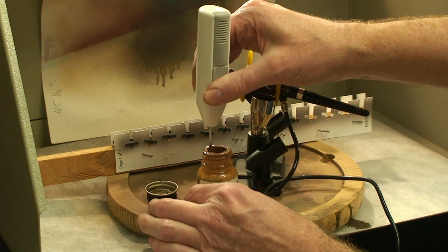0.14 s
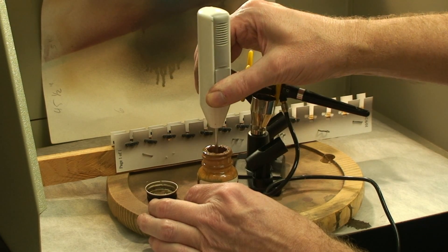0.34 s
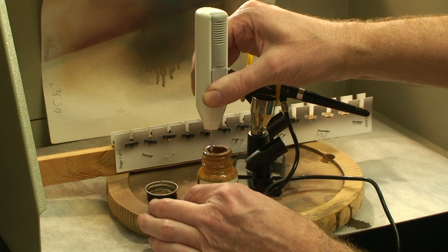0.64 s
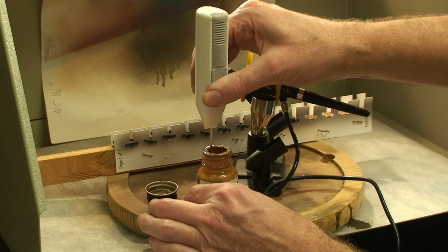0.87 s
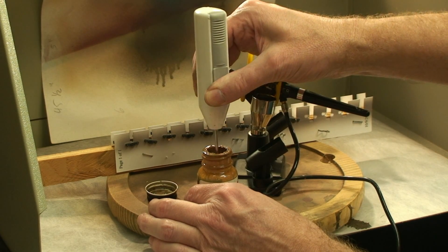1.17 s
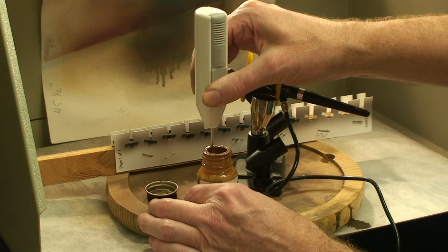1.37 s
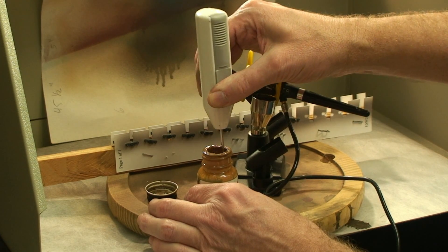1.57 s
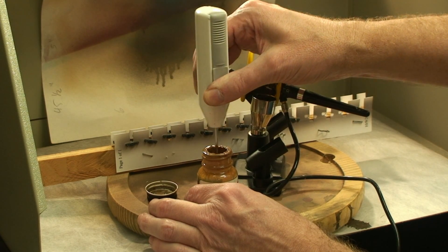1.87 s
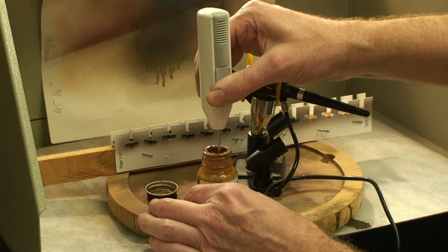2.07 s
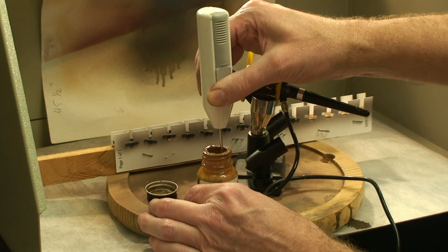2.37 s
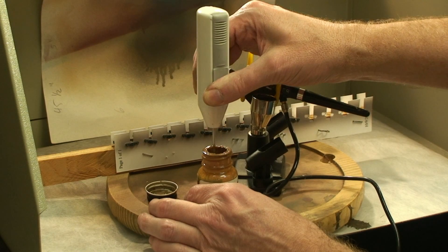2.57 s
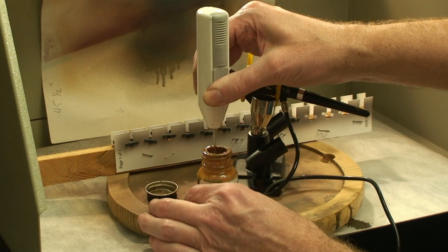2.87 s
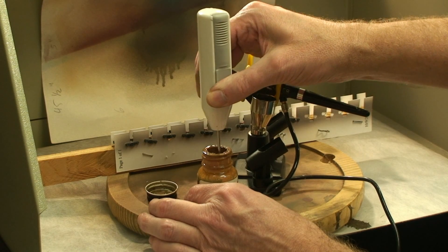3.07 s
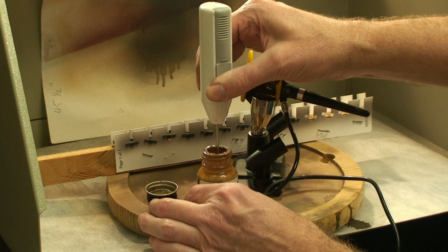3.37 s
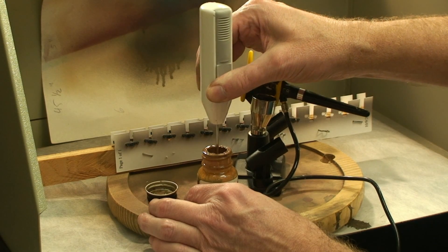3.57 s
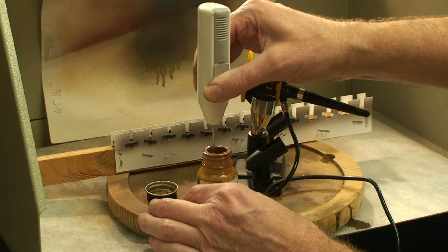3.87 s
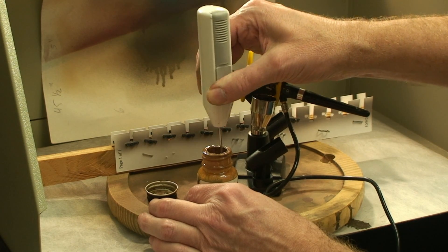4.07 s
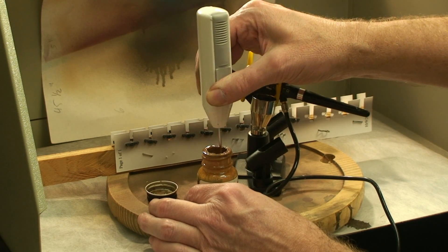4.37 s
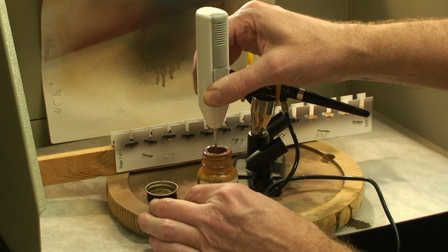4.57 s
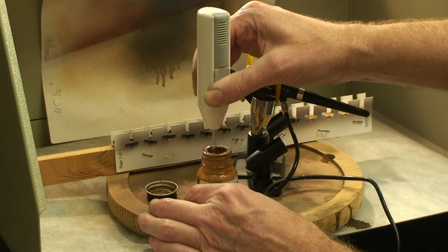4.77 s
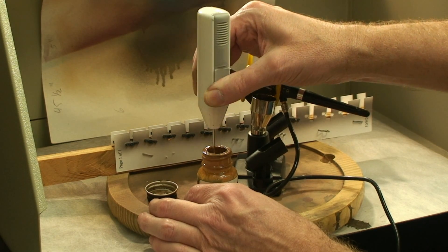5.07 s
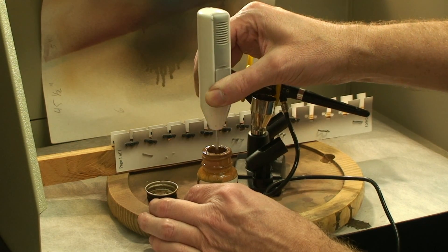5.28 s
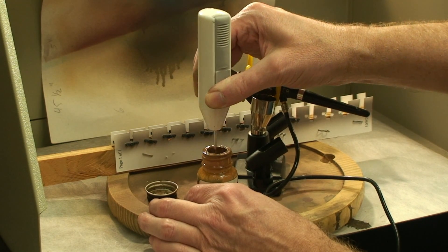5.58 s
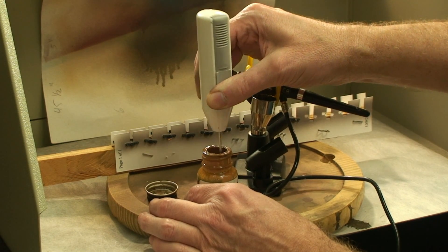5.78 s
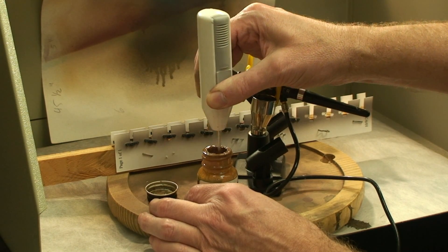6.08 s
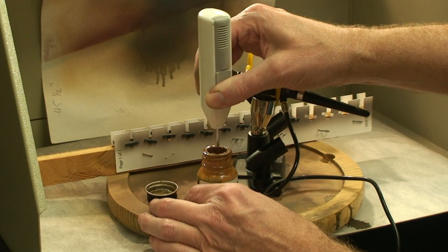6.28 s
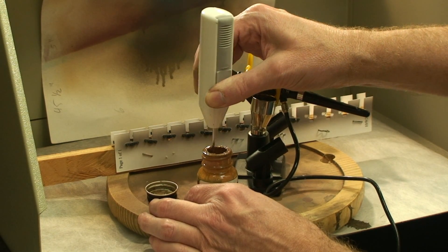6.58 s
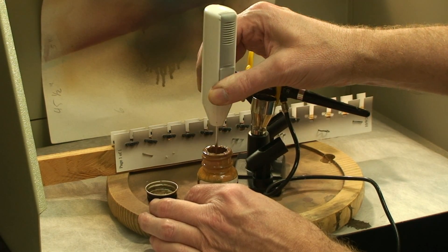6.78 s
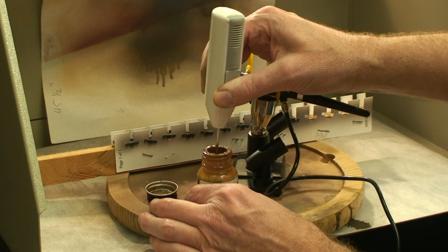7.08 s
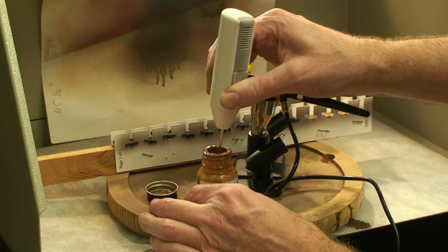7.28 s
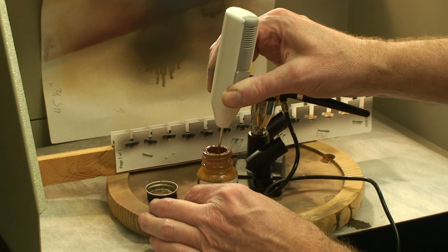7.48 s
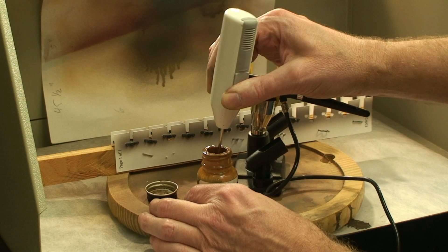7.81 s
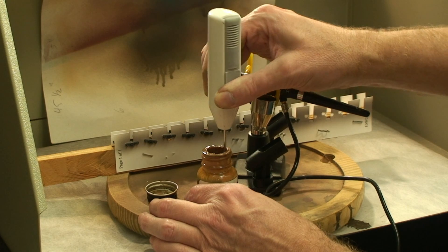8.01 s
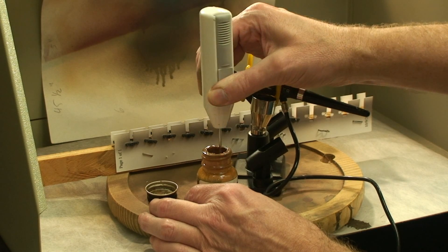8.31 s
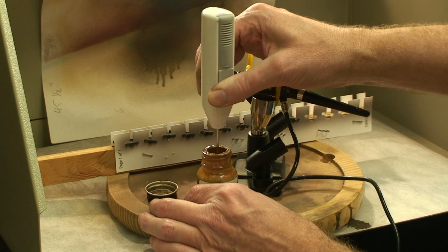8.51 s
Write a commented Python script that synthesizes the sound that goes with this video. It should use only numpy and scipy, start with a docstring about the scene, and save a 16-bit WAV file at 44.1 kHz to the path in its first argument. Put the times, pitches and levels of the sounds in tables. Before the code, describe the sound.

A small battery stirrer whines thinly in a little glass jar, its metal shaft rattling in irregular bursts of dull knocks and bright clinks.

```python
"""A battery stirrer's paddle knocks the floor of a small glass jar on a wooden board, or grazes its wall.
Floor knocks are dull and ring jar and board; grazes clink brightly; both are noise bursts into decaying modes.
The motor, at up to 46 turns a second, whines thinly: a brush-noise pattern repeated each turn in a plastic casing.
Behind lie a short room echo, room rumble and hiss in shaped noise, and faint drones of wavering sines."""
import sys
import numpy as np
from scipy import signal
from scipy.fft import rfft, irfft, next_fast_len
from scipy.io import wavfile
from scipy.ndimage import uniform_filter1d, map_coordinates

SR = 44100
rng = np.random.default_rng(int(sys.argv[2]) if len(sys.argv) > 2 else 0)


def wav_out(sig):
    """Save sig, one row per channel (or a flat mono array), as 16-bit PCM at SR to the path in sys.argv[1]."""
    wavfile.write(sys.argv[1], SR, np.round(np.clip(np.atleast_2d(sig).T, -1, 1) * 32767).astype(np.int16))


def nominal_scale(level):
    """Amplitude ratio for a level in decibels (scalar or array-like)."""
    x = np.asarray(level, float) / 20
    return 10 ** x


N = 381465
T = np.arange(N) / SR  # seconds
WIDE = next_fast_len(N)  # FFT length

# Levels in the tables are relative unless called rms.
# paddle bouncing on the jar's floor: first_s, last_s, blows (count), first_push_db, last_push_db
FLOOR_RUNS = [(.164, .276, 5, -28.5, -33), (.299, .326, 2, -17, -22.5), (1.343, 1.395, 3, -11, -16),
              (1.44, 1.492, 3, -17, -15.5), (1.591, 1.663, 4, -17.5, -14.5), (1.719, 1.74, 2, -26.5, -18.5),
              (1.797, 1.819, 2, -17.5, -18), (1.933, 1.962, 2, -27, -25), (2.605, 2.688, 4, -29, -24),
              (2.73, 2.76, 2, -18.5, -19), (2.879, 2.929, 3, -13.5, -19.5), (2.993, 3.023, 2, -32, -29),
              (3.205, 3.269, 3, -10.5, -27), (3.746, 3.79, 3, -16.5, -25), (4.207, 4.3, 5, -44, -48),
              (4.609, 4.63, 2, -15, -13.5), (4.935, 4.981, 3, -13.5, -24), (5.171, 5.241, 5, -17.5, -24),
              (5.405, 5.464, 3, -27, -21.5), (5.486, 5.516, 2, -13.5, -14.5), (5.713, 5.766, 3, -14, -18.5),
              (5.899, 5.944, 3, -13, -14.5), (5.959, 6.009, 3, -21.5, -19), (6.082, 6.138, 3, -10.5, -27.5),
              (6.325, 6.351, 2, -11, -14), (6.374, 6.425, 3, -8.5, -17), (7.263, 7.288, 2, -11.5, -18),
              (8.007, 8.125, 6, -11.5, -23.5), (8.312, 8.329, 2, -7, -10.5), (8.522, 8.592, 4, -16.5, -13)]
# paddle grazing the wall, about once a turn: first_s, last_s, blows (count), first_sting_db, last_sting_db
WALL_RUNS = [(.019, 0.133, 6, -12.5, -19.5), (.699, 0.788, 5, -12.5, -8.5), (0.814, 0.839, 2, -17.5, -20.5),
             (4.756, 4.798, 3, -18.5, -12.5), (5.018, 5.066, 3, -9.5, -9.5), (6.632, 6.671, 3, -15, -9),
             (7.567, 7.78, 11, -15, -7), (7.801, 7.847, 3, -5.5, -7), (7.87, 7.89, 2, -17.5, -14.5),
             (7.91, 7.953, 3, -8, -14.5)]
# lone blows: start_s, push_db (into jar and board), sting_db (on the glass wall)
LONE_BLOWS = [(.002, -31, -16), (1.248, -36.5, -21.5), (1.326, -20, -23.5), (1.888, -31, -46),
              (2.159, -34.5, -16), (2.233, -18, -26.5), (2.299, -25.5, -50), (2.526, -12, -13.5),
              (2.567, -23.5, -66), (3.186, -21, -26), (3.929, -45.5, -72), (4.035, -43.5, -75),
              (4.082, -38, -48), (4.401, -45, -71), (4.915, -13.5, -23), (5.269, -12.5, -18.5),
              (5.653, -17, -28.5), (5.69, -19, -37), (5.785, -9, -17), (5.879, -24.5, -41),
              (6.058, -10.5, -17.5), (6.2, -32.5, -43), (6.303, -13.5, -22), (6.388, -18, -17),
              (6.471, -12, -22), (6.534, -26.5, -43), (6.701, -46, -31), (7.246, -24.5, -32),
              (7.899, -22.5, -14), (7.961, -11, -14), (7.975, -16, -37), (8.361, -25, -39),
              (8.463, -22.5, -33), (8.481, -8, -16.5)]
# where the paddle lands: start_s, rings_db (tilt towards rings near 1.9 kHz), ping_db (near 2.7 kHz)
LANDING_SPOT = [(0.05, 4, -2), (0.22, -15.5, -4), (0.76, 2.5, 2), (1.65, 1.5, -2), (1.8, -5.5, 11.5),
                (2.501, -5.5, -4.5), (2.931, -4.5, 12), (3.21, -6, 3), (3.77, -2.5, -10), (4.04, 29, -10),
                (4.09, -11, -5), (4.299, 25, -7), (4.63, 12, -17), (4.93, 11.5, 3), (5.2, -2.5, 7),
                (5.601, 3.5, 10), (7.27, -1, -13), (7.7, 5, -5), (8.0, -2.5, 7.5), (8.5, -0.5, 9)]
# modes of the jar on its board: pitch_hz, level_db, t60_s (shortened in board())
BOARD_MODES = [(233.3, -24, 0.25), (329, -17.5, 0.07), (468.5, -10.5, 0.057), (521.6, -14.5, 0.21),
               (701.7, -7.5, 0.27), (720, -5, 0.14), (780.6, -3.5, 0.16), (1036, -4.5, 0.047),
               (1073, -5, 0.11), (1248, 0, 0.061), (1516, -33, 0.26), (1729, -0.5, 0.032),
               (1841, -3.5, 0.061), (1898, -2, 0.069), (1984, -5, 0.13), (2189, -0.5, 0.031),
               (2530, -8, 0.043), (2767, -12, 0.053)]
# modes of the glass wall and steel shaft: pitch_hz, level_db, t60_s
GLASS_MODES = [(3454, 7, 0.007), (3970, 2.5, 0.0082), (5200, -7, 0.0069), (5710, 5.5, 0.0069),
               (6160, 5, 0.0088), (6360, -2, 0.018), (6800, 0, 0.0087), (7350, 5.5, 0.004),
               (8450, -5.5, 0.01), (12540, -15, 0.0092), (14400, -12, 0.013)]
# the shaft's beating top pair, changing as it touches higher or lower: start_s, pitch_hz, split_hz, level_db
SHAFT_PAIR = [(2, 11050, 90, -5), (4, 11720, 380, -9)]
# unloaded motor speed, mostly creeping up as the paint thins: start_s, speed_turns_per_s
FREE_SPEED = [(0, 43), (2.5, 43.1), (3.6, 44.2), (4.5, 44.1), (6.97, 44.9), (7.1, 45.6), (7.3, 45.9),
              (8.65, 45.7)]
# smooth colour of the motor casing: pitch_hz, level_db (per Hz)
CASING_COLOUR = [(1300, -35), (2250, -24.5), (4400, -17), (5350, -19), (5900, -10.5), (6900, -14.5),
                 (8500, -13), (10150, -15.5), (10750, -20.5), (11900, -18.5), (15650, -17), (15900, -42)]
# casing resonances: pitch_hz, width_hz, level_db (over the smooth colour)
CASING_PEAKS = [(3550, 60, 27), (3340, 160, 13), (3680, 160, 15), (2680, 200, 2), (7700, 200, 0),
                (8450, 200, 2), (10150, 150, 2), (14100, 200, -2)]
# echo decay: pitch_hz, t60_s
ROOM_DECAY = [(300, 0.38), (1000, 0.19), (3000, 0.3), (8000, 0.17), (15000, 0.16)]
# room tone colour: pitch_hz, level_db (per Hz)
AIR_COLOUR = [(12, -28), (20, 2), (107, -1.5), (150, -9.5), (188, -10.5), (332, -11.5), (474, -7),
              (663, -13.5), (1410, -14.5), (3000, -19.5), (3900, -71), (6600, -120)]
# left-right likeness of the room tone: pitch_hz, likeness (0 to 1)
AIR_LIKENESS = [(25, 1), (150, 0.5), (300, 0.028), (3000, 0.061)]
# gliding drone: start_s, pitch_hz, level_db (rms before the waver)
GLIDING_DRONE = [(3.2, 147, -84), (3.6, 161, -63), (4.699, 188, -60), (6.201, 212, -66), (6.801, 188, -65),
                 (7.198, 189.5, -58), (7.9, 205.6, -74), (8.3, 207, -75)]
# drones of fixed pitch: pitch_hz, level_db (rms before the waver)
FIXED_DRONES = [(102, -64.5), (479, -69)]
# a late skip: least and most delay_s; least and most loss_db
SKIP_LATE_S = (0.0098, .02)
SKIP_LOSS_DB = (10, 20)

STING_SLOPE, STING_DB, LANDING_DB = 1.127, -9, 3.5  # sting from floor push; extra on a run's first blow
GRAZE_PUSH_DB = -16.5  # push of a graze relative to its sting
UNEVEN_S, UNEVEN_DB, COLOUR_DB = 0.0011, 1.5, 3.5  # spread of timing, force and push-to-sting balance
SAG_TURNS, SAG_PER_PUSH, RECOVER_S = 3.0, 2.0, .09  # deepest sag in turns/s, its drive, recovery time
MOTOR_DB, AIR_DB = -47, -52  # rms
# random draws shared by every function that asks for the blows
BOUNCE = rng.random((300, 4))
CHANCE = rng.standard_normal((len(FLOOR_RUNS + WALL_RUNS), 12, 3))


def run(row, chance):
    """Near-even blows whose force slides from first to last; the inner ones wander most."""
    first_s, last_s, count, first_db, last_db = row
    place = np.linspace(0, 1, round(count))
    late, force, colour = chance[:len(place)].T
    inner = 4 * place * (1 - place)
    s = first_s + (last_s - first_s) * place + UNEVEN_S * late * inner
    force_db = first_db + (last_db - first_db) * place + UNEVEN_DB * force * inner
    return s, force_db, COLOUR_DB * colour, place == 0


def blows():
    """Start, push and sting of every blow, each followed by a weaker rebound and a weaker late skip."""
    rows = [np.transpose(LONE_BLOWS)]
    for k, row in enumerate(FLOOR_RUNS + WALL_RUNS):
        s, force_db, colour_db, first = run(row, CHANCE[k])
        if k < len(FLOOR_RUNS):
            # harder floor blows sting the wall more
            sting_db = STING_SLOPE * force_db + STING_DB + LANDING_DB * first + colour_db
            rows.append([s, force_db, sting_db])
        else:
            rows.append([s, force_db + GRAZE_PUSH_DB + colour_db, force_db])
    s, push_db, sting_db = np.concatenate(rows, axis=1)
    rebound_late, rebound_loss, skip_late, skip_loss = BOUNCE[:len(s)].T
    none = np.zeros(len(s))
    late_s = np.r_[none, .006 + 0.0074 * rebound_late, np.interp(skip_late, (0, 1), SKIP_LATE_S)]
    loss_db = np.r_[none, 7 + 9 * rebound_loss, np.interp(skip_loss, (0, 1), SKIP_LOSS_DB)]
    s = np.tile(s, reps=3) + late_s
    return s, np.tile(push_db, reps=3) - loss_db, np.tile(sting_db, reps=3) - 1.6 * loss_db


def contacts(s, gain, ms, rise=0.13):
    """Each blow is a noisy chatter of contact dying over ms; rise is the attack as a share of ms."""
    t_ms = np.arange(600) / SR * 1000
    shape = np.exp(-t_ms / ms) * np.minimum(t_ms / (rise * ms), 1)
    # unit mean energy, so that gain alone sets the force
    chatter = shape * rng.standard_normal((len(s), len(t_ms))) / np.linalg.norm(shape)
    at = np.round(s * SR).astype(int)[:, None] + np.arange(len(t_ms))
    return np.bincount(at.ravel(), (gain[:, None] * chatter).ravel(), N)[:N]


def edgy_contacts(s, gain, ms):
    """Contact chatter differentiated, which tilts it towards the treble."""
    return np.diff(contacts(s, gain, ms), prepend=0)


def ring(kicks, hz, t60):
    """One decaying mode; a gliding one is shifted down, smoothed and shifted back."""
    r = 1000 ** (-1 / (t60 * SR))
    if np.isscalar(hz):
        lean = r * np.cos(2 * np.pi * hz / SR)
        return signal.lfilter([1, -lean], [1, -2 * lean, r ** 2], kicks)
    turn = np.exp(2j * np.pi * np.cumsum(hz) / SR)
    return (turn * signal.lfilter([1], [1, -r], kicks / turn)).real


def muffled(x, hz):
    """Takes off the top: little passes above hz."""
    return signal.sosfilt(signal.butter(3, hz, fs=SR, output="sos"), x)


def board():
    """Pushes ring the jar and board; the landing spot shifts weight to or from rings near 1.9 and 2.7 kHz."""
    s, push_db, _ = blows()
    when, rings_db, ping_db = np.transpose(LANDING_SPOT)
    rings_db, ping_db = np.interp(s, when, rings_db), np.interp(s, when, ping_db)
    # the many dense, quickly dying modes merge into a dry thud
    out = nominal_scale(-10.5) * ring(edgy_contacts(s, nominal_scale(push_db), 15.0), 1600, 0.0028)
    for hz, db, t60 in BOARD_MODES:
        tilt = np.exp(-((hz - 1900) / 220) ** 2) - .5  # up near 1.9 kHz, down elsewhere
        mode_db = push_db + db + tilt * rings_db + (hz > 2650) * ping_db
        out += ring(contacts(s, nominal_scale(mode_db), 2.17, rise=0.69), hz, 0.76 * t60)
    return nominal_scale(-7.0) * muffled(out, 3050)


def glass():
    """A tick, a scrape, a rasp and the wall's short rings; soft blows lose most of the top treble."""
    s, push_db, sting_db = blows()
    soft = 1 - np.clip((sting_db - push_db + 19) / 20, 0, 1)  # 0 glancing, 1 mostly push
    tick = ring(edgy_contacts(s, nominal_scale(sting_db + 1.5 - 5.2 * soft), 0.3), 4600, 0.00031)
    scrape = ring(edgy_contacts(s, nominal_scale(sting_db + 11.5 - 20 * soft), 5.5), 6400, 0.0018)
    rasp = ring(edgy_contacts(s, nominal_scale(sting_db + 17.5 - 33 * soft), 14.0), 2240, 0.0028)
    body = tick + scrape + rasp
    top = edgy_contacts(s, nominal_scale(sting_db + 14.5 - 60 * soft), 3.5)
    when, shaft_hz, split_hz, shaft_db = np.transpose(SHAFT_PAIR)
    for plane in (-.5, .5):
        kicks = contacts(s, nominal_scale(sting_db + np.interp(s, when, shaft_db) - 60 * soft), 0.53)
        top += ring(kicks, np.interp(T, when, shaft_hz + plane * split_hz), 0.035)
    for hz, db, t60 in GLASS_MODES:
        dull_db = -15 * soft * np.log2(hz / 5000)
        rung = ring(contacts(s, nominal_scale(sting_db + db + dull_db), 4.0), hz, t60)
        if hz < 8000:
            body += rung
        else:
            top += rung
    return nominal_scale(-8.0) * (muffled(body, 9600) + top)


def speed():
    """Turns a second: the free speed less a sag, as pushes brake the motor and it then recovers."""
    s, push_db, _ = blows()
    load = np.bincount(np.round(s * SR).astype(int), nominal_scale(push_db), N)[:N]
    load = signal.lfilter([1], [1, -np.exp(-1 / (RECOVER_S * SR))], load)
    sag = uniform_filter1d(np.tanh(SAG_PER_PUSH * load), size=1500)
    return np.interp(T, *np.transpose(FREE_SPEED)) - SAG_TURNS * sag


def evened(x):
    """Scales to rms 1."""
    return x / np.sqrt(np.mean(x ** 2) + 1e-20)


def read(points, hz):
    """Reads a spectrum table on a log-frequency axis."""
    f, value = np.transpose(points)
    return np.interp(np.log(hz + 1), np.log(f + 1), value)


def coloured(x, gain_at):
    """Filters by a gain given as a function of Hz."""
    return irfft(rfft(x, WIDE) * gain_at(np.fft.rfftfreq(WIDE, 1 / SR)), WIDE)[..., :N]


def casing(hz):
    """Gain of the plastic: its smooth colour with sharp resonances on top."""
    peaks = sum(nominal_scale(db) / (1 + (2 * (hz - f) / width) ** 2) for f, width, db in CASING_PEAKS)
    return nominal_scale(read(CASING_COLOUR, hz)) * (1 + peaks)


def motor():
    """A scratchy brush pattern comes round every turn, changing slowly, and buzzes the casing."""
    turns = np.cumsum(speed()) / SR
    size, orders = 4096, 360  # points in a turn, harmonics of the turn
    angle = np.arange(size) / size
    ticks = .5 + 0.94 * np.exp(-(angle * 6 % 1) / 0.053)  # six commutator edges a turn
    ticks *= 1 + 0.22 * np.cos(2 * np.pi * angle)  # the rotor is off balance
    third_db = 5 * (np.arange(orders) % 3 == 0)  # three poles: every third order stands out
    standing = nominal_scale(1.5 * rng.standard_normal(orders) + third_db)
    spectra = rfft(rng.standard_normal((20, size)) * ticks)[:, :orders]
    patterns = irfft(spectra * standing, size)
    # fades through 1.1 patterns a second while reading round the turn
    steady = map_coordinates(patterns, [T * 1.1, turns % 1 * (size - 1)], order=1)
    loose = evened(rng.standard_normal((2, N)) * ticks[(turns % 1 * size).astype(int)])
    brushes = evened(steady) + .4 * loose + .3 * loose[0]
    return nominal_scale(MOTOR_DB) * evened(coloured(brushes, casing))


def room(x):
    """Sparse echo taps of random sign, each band dying at its own speed, different in each ear."""
    taps = np.zeros((2, SR // 2))
    at = np.arange(60, SR // 2 - 20, 20) + rng.integers(0, 20, (2, (SR // 2 - 61) // 20))
    np.put_along_axis(taps, at, rng.choice([-1., 1.], at.shape), 1)
    hz, t, z = signal.stft(taps, SR, nperseg=256)
    decay = nominal_scale(-60 * t / read(ROOM_DECAY, hz)[:, None])
    tail = signal.istft(z * decay, SR, nperseg=256)[1]
    tail = tail / np.linalg.norm(tail[0])
    return signal.fftconvolve(x[None], 0.52 * tail + 0.75 * tail.mean(0), axes=1)[:, :N]


def air():
    """Room rumble and hiss from shaped noise, alike in both ears only in the bass, where the right is louder."""
    left, other = rng.standard_normal((2, N))

    def same(hz):
        return np.clip(read(AIR_LIKENESS, hz), 0, 1)

    shared = coloured(left, lambda hz: same(hz) * nominal_scale(3.0 * same(hz)))
    right = shared + coloured(other, lambda hz: np.sqrt(1 - same(hz) ** 2))
    tone = coloured(np.array([left, right]), lambda hz: nominal_scale(read(AIR_COLOUR, hz)))
    return nominal_scale(AIR_DB) * evened(tone)


def drones():
    """A gliding low sine and two of fixed pitch, all wavering in level together."""
    s, hz, db = np.transpose(GLIDING_DRONE)
    waver = 1 + 0.56 * evened(uniform_filter1d(rng.standard_normal(N), size=4000))
    glide = nominal_scale(np.interp(T, s, db)) * np.sin(2 * np.pi * np.cumsum(np.interp(T, s, hz)) / SR)
    fixed = sum(nominal_scale(d) * np.sin(2 * np.pi * f * T) for f, d in FIXED_DRONES)
    return np.sqrt(2) * waver * (glide + fixed)


def scene():
    """Jar straight ahead with its room echo, then motor, room tone and drones."""
    knocks, clinks = board(), glass()
    echo = room(nominal_scale(-7.0) * knocks + nominal_scale(-7.0) * clinks)
    return knocks + clinks + echo + motor() + air() + drones()


def top_cut(x):
    """Nothing passes above the cut-off."""
    return signal.sosfilt(signal.butter(12, 16980, fs=SR, output="sos"), x)


def record(dry):
    """Limits the band to about 16 kHz with a steep lowpass and finishes the mix."""
    edge = signal.firwin(255, 16100, window=("kaiser", 7), fs=SR)
    mix = signal.oaconvolve(dry, edge[None], "same")
    return top_cut(mix)


dry = scene()
out = record(dry)
wav_out(out)
```